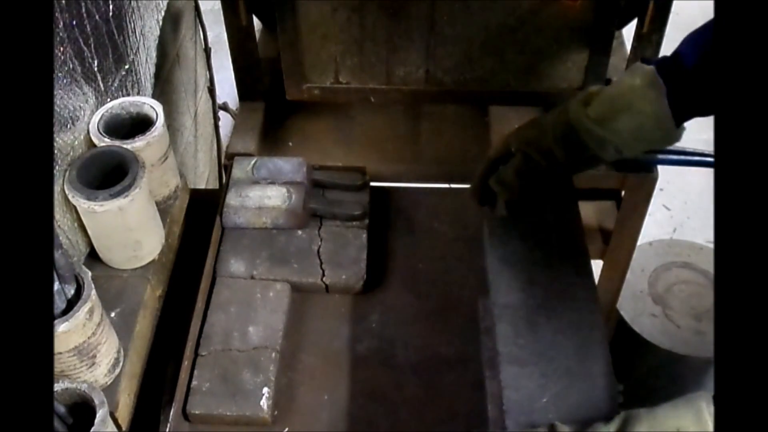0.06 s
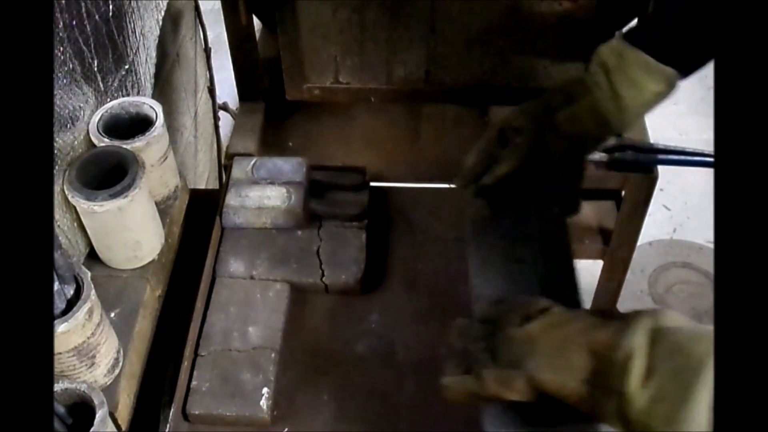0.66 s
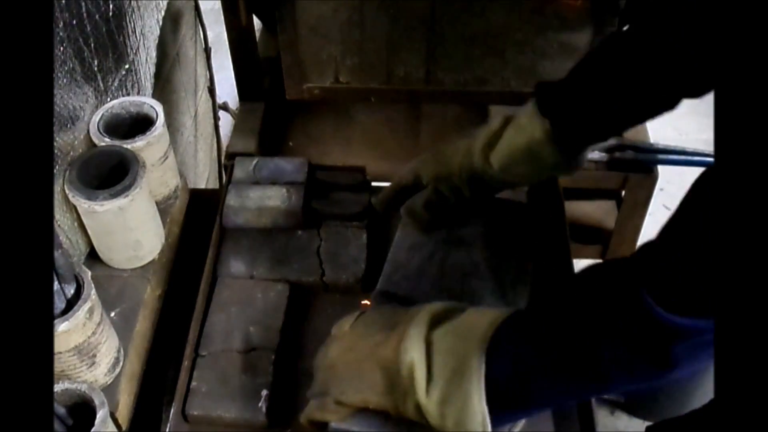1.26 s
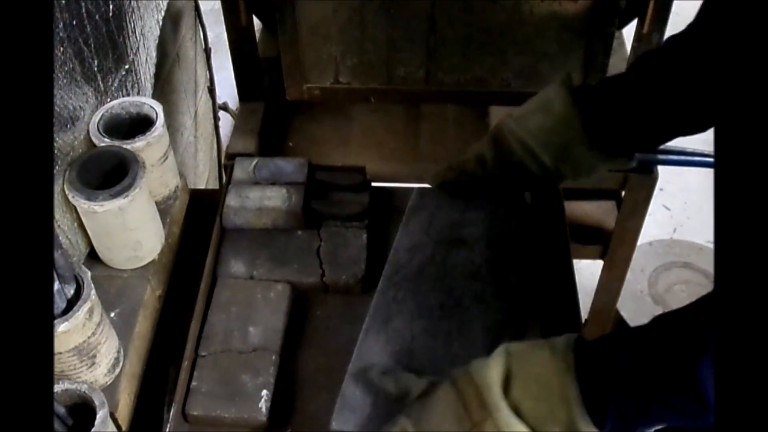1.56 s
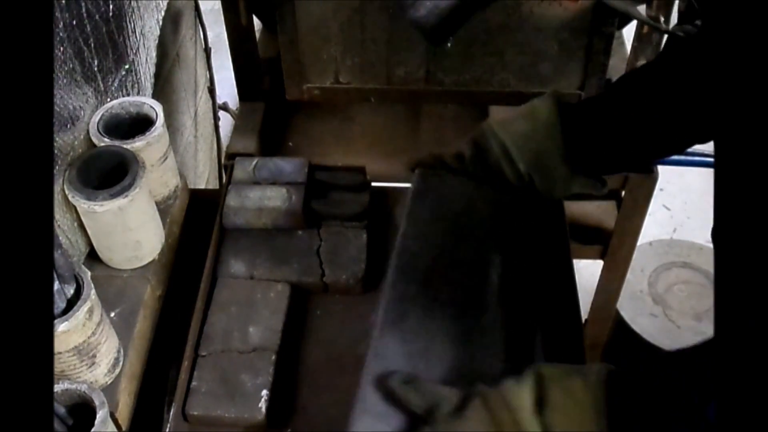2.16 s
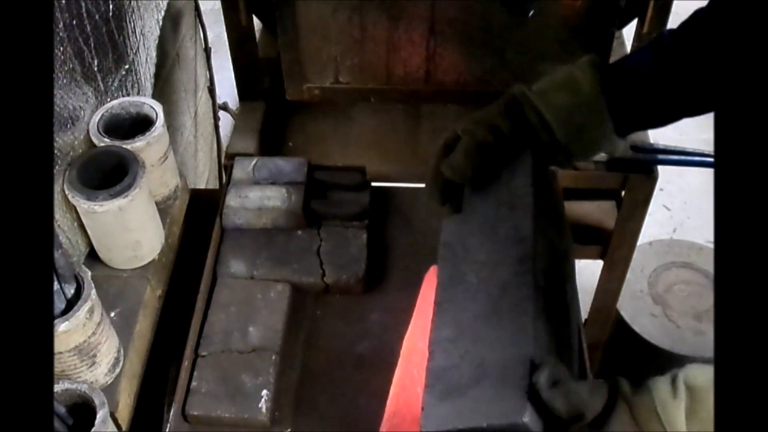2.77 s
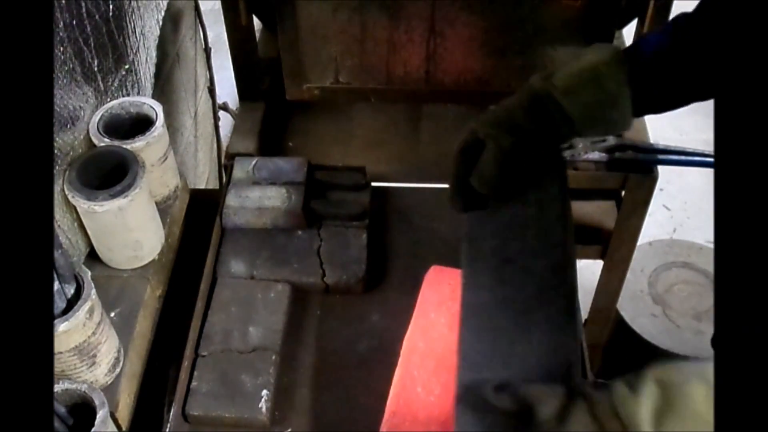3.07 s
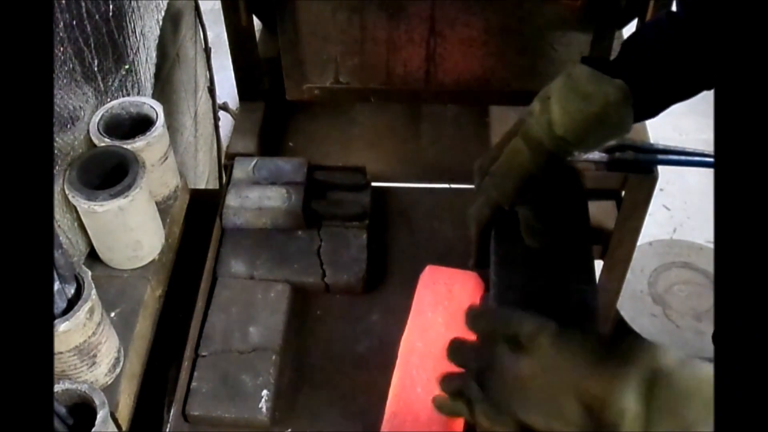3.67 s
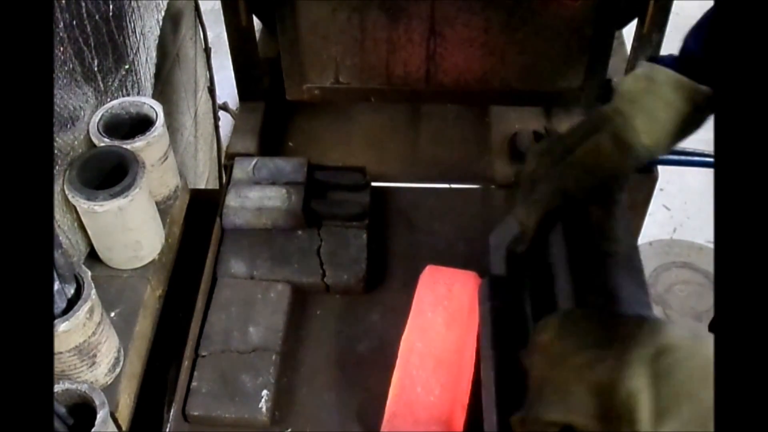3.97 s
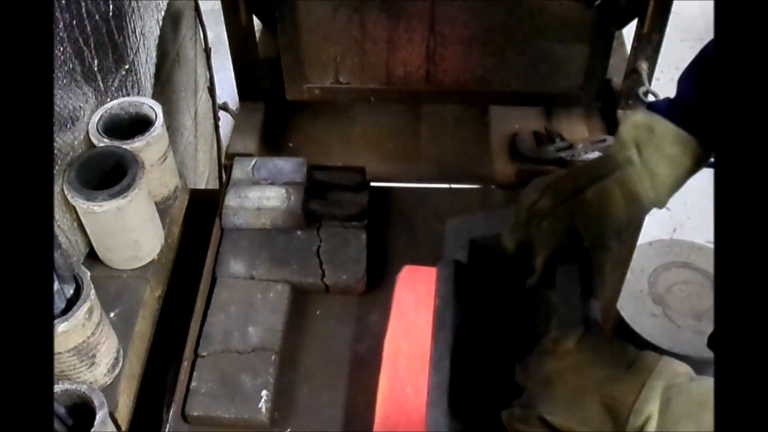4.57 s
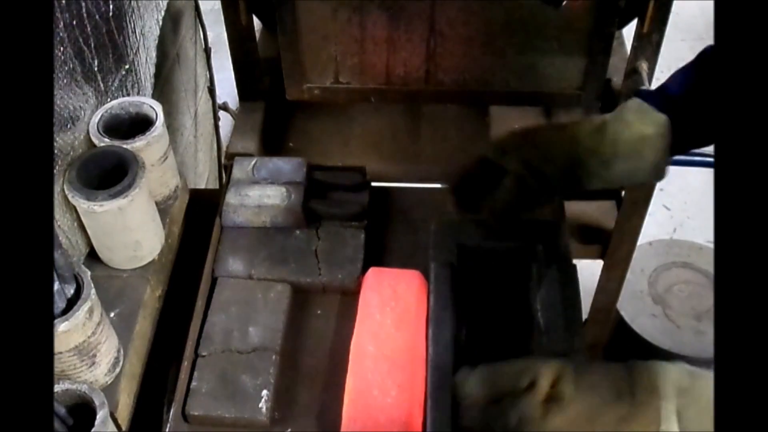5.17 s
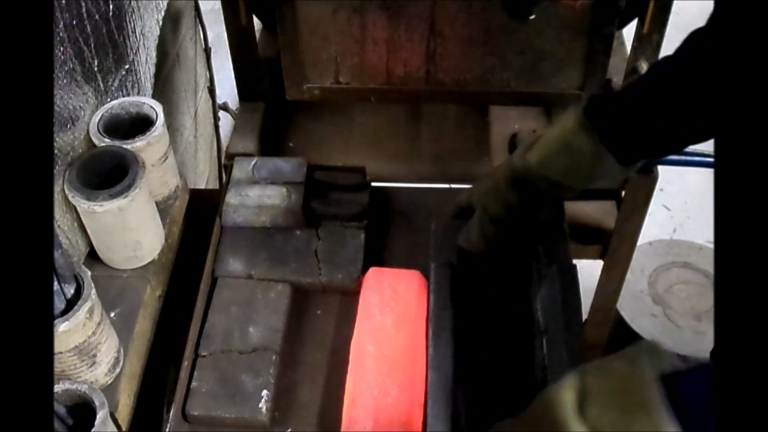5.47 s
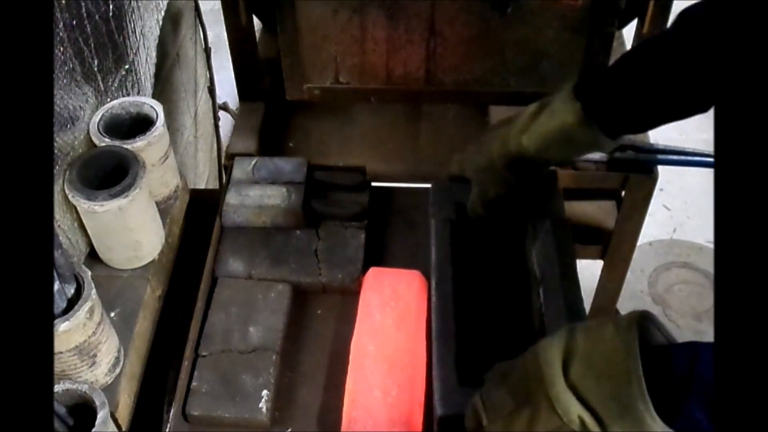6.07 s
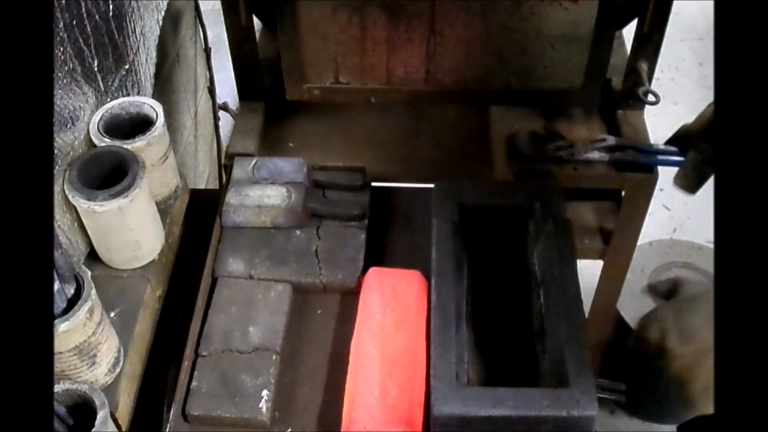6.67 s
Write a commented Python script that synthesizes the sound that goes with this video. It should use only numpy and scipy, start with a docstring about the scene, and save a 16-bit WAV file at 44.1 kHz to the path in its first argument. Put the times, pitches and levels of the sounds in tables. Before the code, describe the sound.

A machine hums throughout in a small workshop, an airy fan rush over slightly wavering motor tones, heard from a microphone at the bench. A light touch sounds at the very start. At 1.1 seconds a heavy metal mould tips over with the loudest blow, a slightly distorted clunk and thud, followed at once by a smaller knock. At 2.5 seconds it drags off the ingot with a short gritty crunch, and it knocks again around 3.2 seconds. As it is rolled upright, two hard clacks come at about 4.4 seconds, faint ticks near 4.8, and a heavier crunching double knock at 5.1. Each rings briefly in mould and bench, with a little room echo. The hum dips after the loud knocks and swells back. Faint bumps follow near 5.9 seconds and a last light tap at 6.6.

```python
"""A small workshop, one microphone at the bench; a machine hums beside it throughout.
After a light touch, the mould of a glowing ingot is tipped over at 1.1 s, a blow that overloads the recorder.
From 2.5 s it is dragged off the ingot, then rolled upright: gritty knocks that ring in mould and bench.
The gain control ducks at the knocks and lets the hum swell back. A last light tap comes at 6.6 s."""
import sys
import numpy as np
from scipy import signal
from scipy.fft import rfft, irfft, next_fast_len
from scipy.io import wavfile
from scipy.ndimage import uniform_filter1d

SR = 44100
rng = np.random.default_rng(int(sys.argv[2]) if len(sys.argv) > 2 else 0)


def log_audio(samples):
    """Write samples as a 16-bit WAV file to the path given in sys.argv[1]."""
    # one column per channel
    frames = np.atleast_2d(samples).T
    # limit to full scale, then quantise
    limited = np.clip(frames, -1, 1)
    pcm = np.round(limited * 32767).astype(np.int16)
    wavfile.write(sys.argv[1], SR, pcm)


N = 304731
TIME = np.arange(N) / SR


def from_db(db):
    """Decibels to gain."""
    return 10 ** (np.asarray(db) / 20)


def at_hz(points, hz):
    """Read a table on a log-frequency axis."""
    f, value = np.transpose(points)
    return np.interp(np.log(np.maximum(hz, 1)), np.log(f), value)


def coloured(x, gain_at):
    """Filter a steady signal by a gain given as a function of frequency."""
    size = next_fast_len(N)
    return irfft(rfft(x, size) * gain_at(np.arange(size // 2 + 1) * SR / size), size)[:N]


def machine(waver=0.11, waver_hz=1.07):
    """Beside the bench: fan noise through a resonant duct, over slightly wavering motor tones."""
    # rush of the fan: f/Hz, density/dB per Hz
    fan = [(20, -92), (32, -99), (66, -77), (76, -68), (104, -73), (129, -81), (146, -73.5), (320, -77.5),
           (560, -75.5), (860, -86), (1600, -80), (2400, -85.5), (4000, -91), (6500, -94.5), (12000, -94.5),
           (15500, -111)]
    # resonances of housing and duct: f/Hz, width/Hz, density/dB per Hz
    duct = [(168, 38, -68), (198, 37.5, -60.5), (260, 17, -78), (289.6, 16, -62.5), (341, 14, -66),
            (380, 22, -63.5), (433.6, 42, -59), (486, 33, -56), (562, 35.5, -59.5), (646, 32, -76),
            (678.5, 34, -62.5), (727, 23, -65), (799, 26, -68), (871, 4.4, -68), (944, 52, -70.5),
            (1047, 43.5, -66.5), (1226, 155, -77), (1451, 25, -70.5), (1665, 42, -80.5), (1980, 49, -77),
            (2590, 23, -80), (3040, 530, -83.5)]
    # motor tones: f/Hz, rms level/dB
    motor = [(45.5, -58), (52.8, -52), (104, -59), (111, -56), (119.7, -53.5), (175, -55.5), (431, -51),
             (490, -51.5), (569, -63), (689, -61.5), (1283, -83)]

    def fan_gain(hz):
        peaks = sum(from_db(db) ** 2 / (1 + 2 * ((hz - f) / width) ** 2) ** 2 for f, width, db in duct)
        return np.sqrt((from_db(at_hz(fan, hz)) ** 2 + peaks) * SR / 2)
    hum = coloured(rng.standard_normal(N), fan_gain)
    for hz, db in motor:
        drifts = rng.standard_normal((2, 200))
        swell, lag = (np.interp(2 * waver_hz * TIME, np.arange(200), drift) for drift in drifts)
        phase = 2 * np.pi * (hz * TIME + rng.random()) + 2 * waver * lag
        hum += from_db(db) * np.sqrt(2) * (1 + waver * swell) * np.sin(phase)
    return hum


def envelope(t, rise, grind, sag_db_per_s=27, release_s=0.025):
    """Pressure builds up to t = 0, eases while the faces grind, then lets go."""
    attack = np.minimum(t, 0) / rise
    letting_go = np.maximum(t - grind, 0) / release_s
    return np.exp(attack - letting_go) * from_db(-sag_db_per_s * np.clip(t, 0, grind))


def pressures(thud_lag_s=0.0017, grit_lag_s=0.0033):
    """Pressure on bench frame, bench top, mould faces and scale as the mould lands, grinds and rests."""
    # mould on ingot or bench: t/s, level/dB, rise/s, grind/s, then re level: thud/dB, clack/dB, grit/dB
    contacts = [ (0.003, -30, .004, 0.021, 1, 5.5, -7), (1.119, -13.5, 0.00064, 0.025, 15, 6.5, 3.5),
                (1.211, -19, 0.011, 0.0019, 3, -4, 2), (2.549, -21.5, 0.0077, 0.068, -0.5, 1.5, 2),
                (2.731, -42, 0.0054, 0.00083, -14, -19, 0), (3.174, -38, .008, 0.02, 3, 9, -14),
                (3.223, -23, 0.013, 0.026, 1.5, 3.5, -1), (3.293, -31.5, .014, .005, 10, -8, 0),
                (4.340, -21, 0.0023, 0.02, -2.5, 5, -3), (4.431, -15, 0.0051, 0.015, -6, 2.5, 2),
                (4.795, -35.5, 0.0089, .004, -14, 0, 1.5), (4.878, -39.5, .003, .002, -14, 5, 5),
                (5.071, -20, 0.0087, 0.044, 4.5, 3, 4), (5.13, -16.5, .0035, 0.00077, 8.5, 2.5, -0.5),
                (5.838, -38.5, 0.017, .035, -15, -3, -15), (5.938, -41.5, 0.011, 0.0055, 6, -10, -4),
                (6.566, -35.5, .003, .004, 1, 3, -6)]
    power = np.zeros((4, N))
    for at, db, rise, grind, thud_db, clack_db, grit_db in contacts:
        near = slice(max(0, int((at - .5) * SR)), int((at + .5) * SR))
        t = TIME[near] - at
        push = envelope(t, rise, grind)
        # the bench takes the weight, mostly at first
        weight = from_db(thud_db) * envelope(t - thud_lag_s, rise, grind, 200, release_s=0.0081)
        strike = from_db(clack_db) * push
        crunch = from_db(grit_db) * envelope(t - grit_lag_s, rise, grind)
        power[:, near] += (from_db(db) * np.array([push, weight, strike, crunch])) ** 2
    return np.sqrt(power)


def grains(spectrum, spread_db):
    """Dense tiny impacts of uneven size, with the given colour; rms 1."""
    clicks = rng.standard_normal(N) * from_db(spread_db * np.clip(rng.standard_normal(N), -2, 2))
    clicks = coloured(clicks, lambda hz: from_db(at_hz(spectrum, hz)))
    return clicks / np.sqrt(np.mean(clicks ** 2) + 1e-20)


def ring(pressure, modes):
    """Modes driven by micro-impacts that follow the pressure; their levels count only re each other."""
    force, ringing = pressure * rng.choice([-1, 1], N) + 1e-18, 0
    for hz, db, t60 in modes:
        radius, angle = from_db(-60 / (t60 * SR)), 2 * np.pi * hz / SR
        mode = signal.lfilter([1, 0, -1], [1, -2 * radius * np.cos(angle), radius ** 2], force)
        ringing += from_db(db) * np.sqrt((1 - radius ** 2) / 2) * mode
    return ringing / np.linalg.norm(from_db(np.array(modes)[:, 1]))


def bench_knock(push, weight):
    """The bench clunks dully, its frame rings and its top thuds under the mould's weight."""
    # dense, quickly damped vibration of the bench: f/Hz, relative density/dB
    clunk_spectrum = [(50, -29), (140, -7), (210, 2.5), (550, 2.5), (750, 1.5), (1100, -3), (2000, -1),
                      (3000, -12.5), (5000, -33), (15000, -38)]
    # modes of the frame: f/Hz, level/dB, t60/s
    frame_modes = [(206, -1, 0.11), (253, -9, 0.32), (469.6, -3, 0.13), (668, -14, 0.082),
                   (684.4, 0, 0.074), (735, -8, 0.11), (806, -6, 0.08), (944, -12.5, 0.2)]
    # modes of the top: f/Hz, level/dB, t60/s
    top_modes = [(104, -18.5, 0.073), (290, -33, 0.17), (339.4, 0, 0.082), (410, -31, 0.16),
                 (656, -4, 0.063)]
    clunk = from_db(-1.5) * push * grains(clunk_spectrum, spread_db=3.5)
    return clunk + from_db(-2.5) * ring(push, frame_modes) + from_db(-4) * ring(weight, top_modes)


def mould_clack(strike):
    """The mould's faces strike hard and dry, and its body rings."""
    # clack of the faces: f/Hz, relative density/dB
    clack_spectrum = [(500, -39), (900, -0.5), (1400, 4), (2300, -0.5), (3000, -10), (4500, -19),
                      (7000, -36), (15000, -55)]
    # modes of the mould: f/Hz, level/dB, t60/s
    mould_modes = [(1170, -10, 0.046), (1324, 1.5, 0.045), (1573, 7.5, 0.035), (1710, -5, 0.036),
                   (1880, -5, 0.06), (2120, -19, 0.059), (2450, -22, 0.094), (4100, -3, 0.086),
                   (4460, -7, 0.066), (5000, -13, 0.067), (5270, -8.5, 0.099), (6150, -34, 0.096)]
    clack = from_db(-11.5) * strike * grains(clack_spectrum, spread_db=4)
    return clack + from_db(-11) * ring(strike, mould_modes)


def scale_crunch(crunch):
    """Scale gives way between the faces just after they meet."""
    # grit of the scale: f/Hz, relative density/dB
    grit_spectrum = [(800, -46), (2200, -1), (3600, -0.5), (6000, -2), (8000, -3), (10000, -2.5),
                     (12500, -6.5), (14000, -15), (16000, -16)]
    return from_db(-9) * crunch * grains(grit_spectrum, spread_db=1)


def edge_ring(crunch):
    """A dragging edge rings thinly along with the grit."""
    # modes of the edge: f/Hz, level/dB, t60/s
    edge_modes = [(9240, -14, .12), (10310, -17, .12), (11500, -3, 0.17), (11400, -4, 0.13),
                  (12460, -12, 0.17), (13000, -11, .16)]
    return from_db(-23) * ring(crunch, edge_modes)


def workshop(direct, wet_db=-11, first_echo_s=0.012):
    """Diffuse reflections follow the direct sound to the microphone and die away octave by octave."""
    # decay of the room: f/Hz, t60/s
    room_t60 = [(100, 0.54), (500, 0.27), (2000, 0.46), (8000, 0.34), (16000, 0.36)]
    t, tail = TIME[:SR], 0
    edges = np.geomspace(60, 16000, 9)
    for low, high in zip(edges, edges[1:]):
        octave = signal.butter(2, [low, high], "band", fs=SR, output="sos")
        decay = from_db(-60 * t / at_hz(room_t60, np.sqrt(low * high)))
        tail += decay * signal.sosfilt(octave, rng.standard_normal(len(t)))
    tail *= t > first_echo_s
    return direct + from_db(wet_db) * signal.fftconvolve(direct, tail / np.linalg.norm(tail))[:N]


def scene():
    """At the microphone, in mono: knocks in the room over the running machine."""
    push, weight, strike, crunch = pressures()
    knocks = bench_knock(push, weight) + mould_clack(strike) + scale_crunch(crunch) + edge_ring(crunch)
    return (workshop(knocks) + machine())[None]


def gain_control(x, threshold_db=-22.5, knee_db=7.5, window_s=0.0067, attack_s=0.023):
    """Level above a soft threshold pulls the gain down quickly; it creeps back at a steady rate."""
    level = 10 * np.log10(np.abs(uniform_filter1d(x ** 2, int(window_s * SR))) + 1e-12)
    excess = knee_db * np.logaddexp(0, (level - threshold_db) / knee_db)
    recovery = 11.5 * TIME   # 11.5 dB/s
    held = np.maximum.accumulate(excess + recovery, axis=-1) - recovery
    pole = np.exp(-1 / (attack_s * SR))
    return x * from_db(-signal.lfilter([1 - pole], [1, -pole], held))


def record(dry, port_hz=11300, port_q=4.9, port_gain=0.92, ceiling=0.19, low_hz=30, top_hz=15720):
    """A resonant microphone port, gain control, overload, then a low cut and a steep top cut."""
    x = dry + port_gain * signal.lfilter(*signal.iirpeak(port_hz, port_q, fs=SR), dry)
    x = gain_control(x)
    x = x / (1 + (x / ceiling) ** 8) ** (1 / 8)   # soft clipping
    x = signal.sosfilt(signal.butter(2, low_hz, "high", fs=SR, output="sos"), x)
    return signal.sosfilt(signal.ellip(12, .2, 80, top_hz, fs=SR, output="sos"), x)


dry = scene()
out = record(dry)
log_audio(out)
```